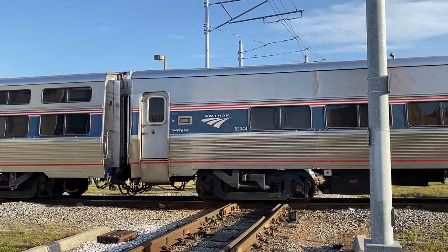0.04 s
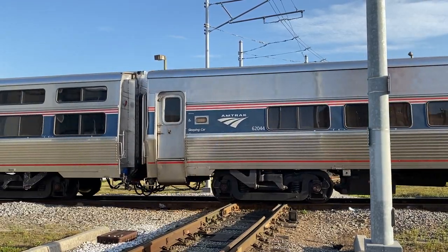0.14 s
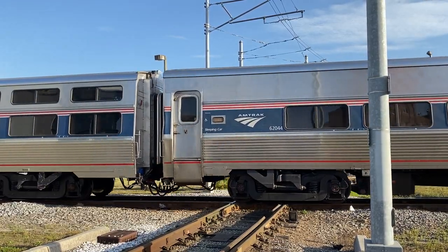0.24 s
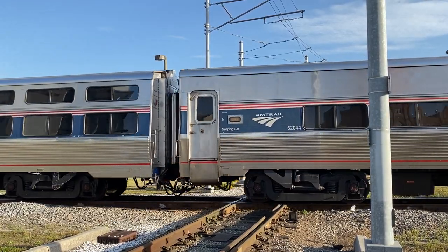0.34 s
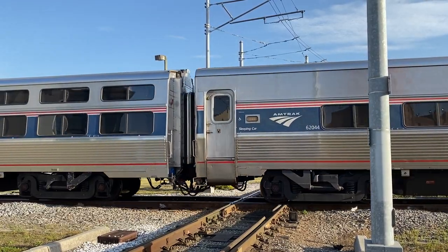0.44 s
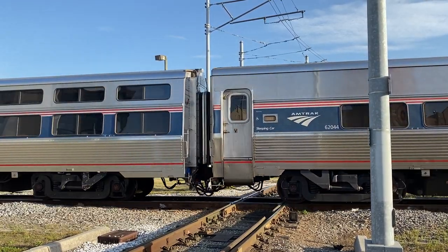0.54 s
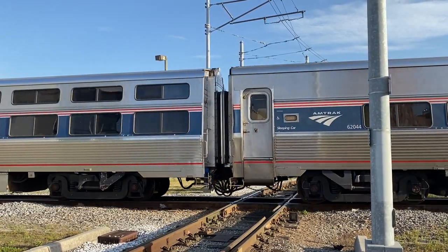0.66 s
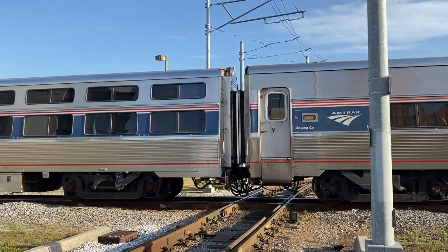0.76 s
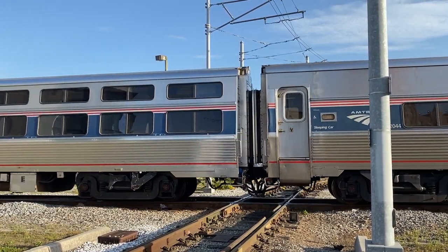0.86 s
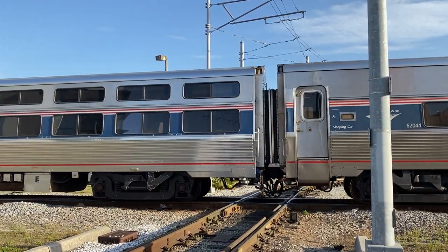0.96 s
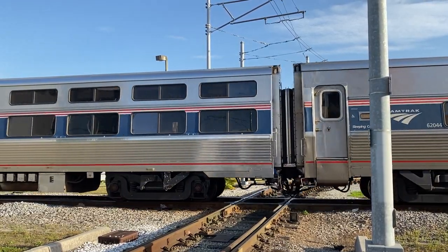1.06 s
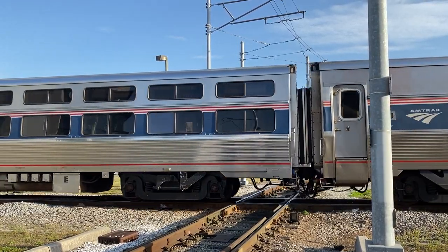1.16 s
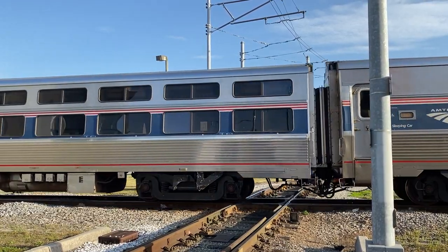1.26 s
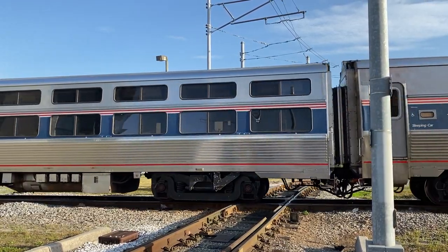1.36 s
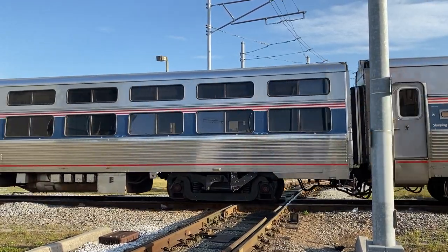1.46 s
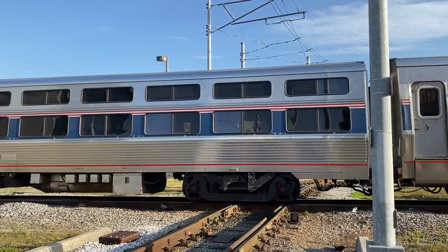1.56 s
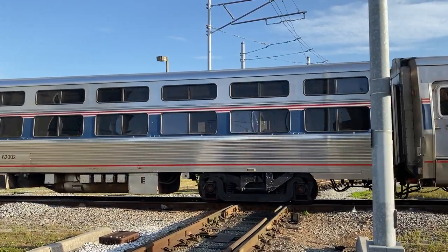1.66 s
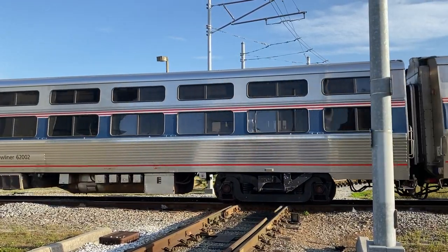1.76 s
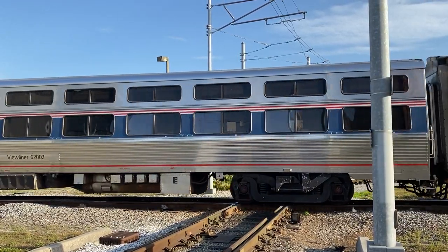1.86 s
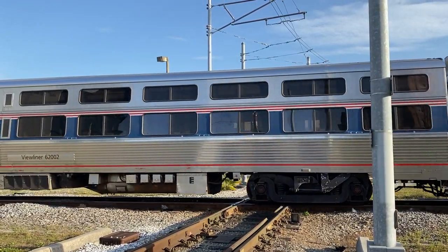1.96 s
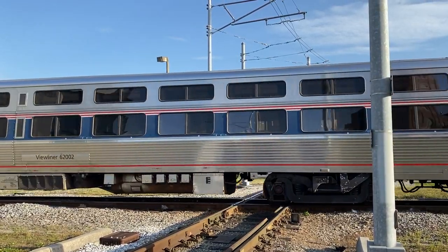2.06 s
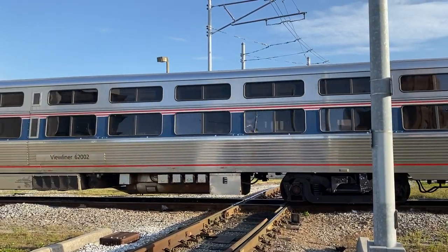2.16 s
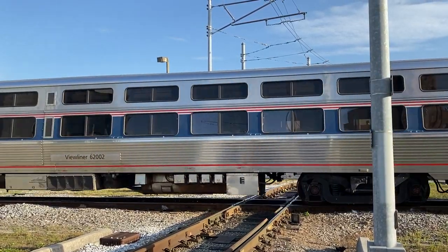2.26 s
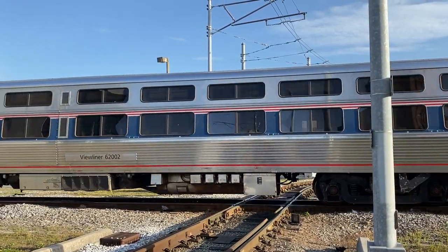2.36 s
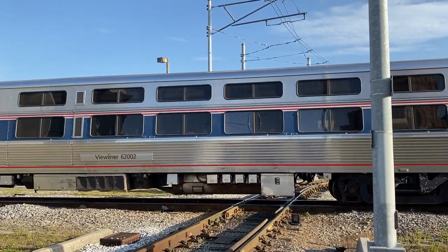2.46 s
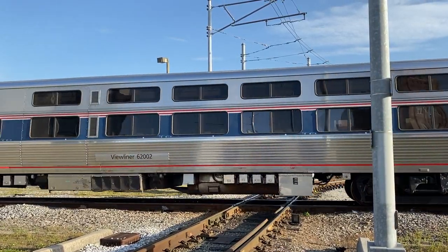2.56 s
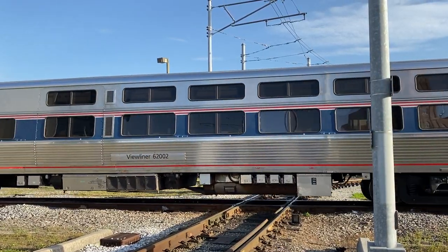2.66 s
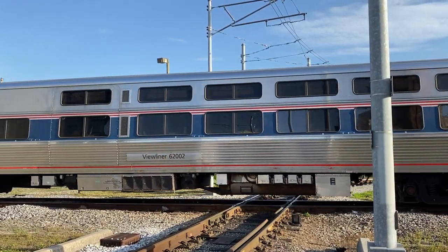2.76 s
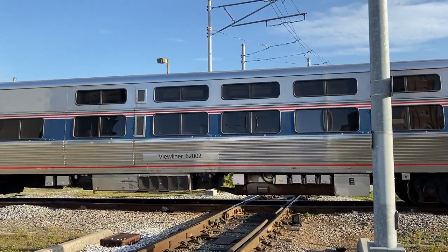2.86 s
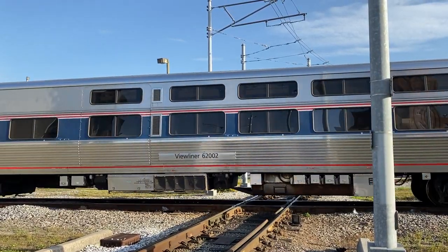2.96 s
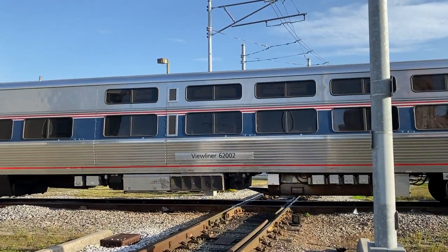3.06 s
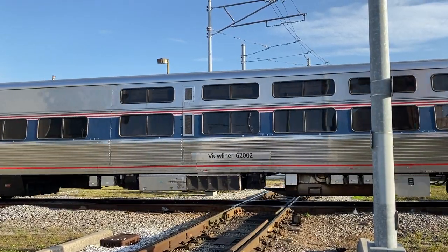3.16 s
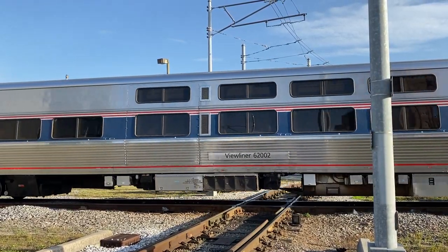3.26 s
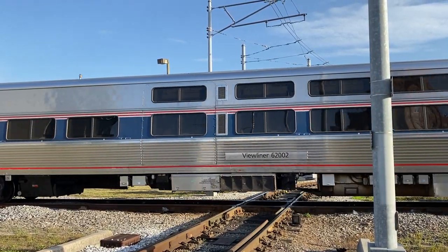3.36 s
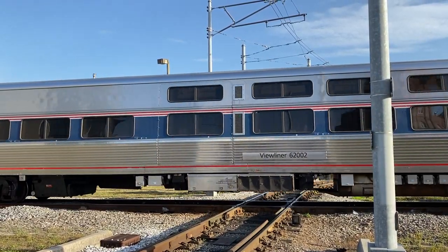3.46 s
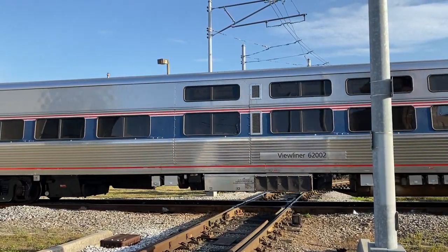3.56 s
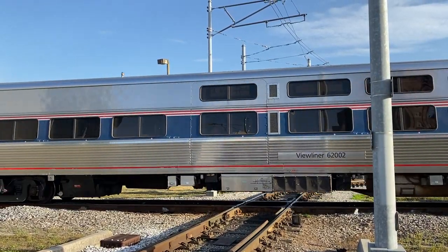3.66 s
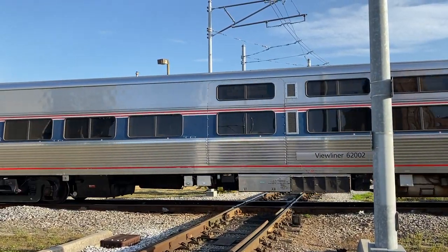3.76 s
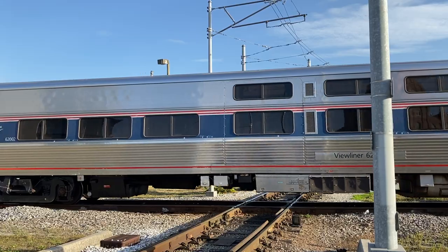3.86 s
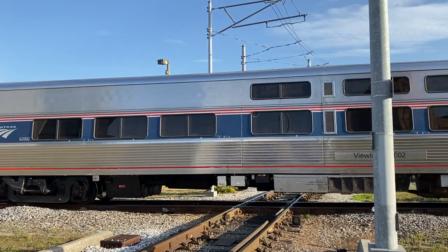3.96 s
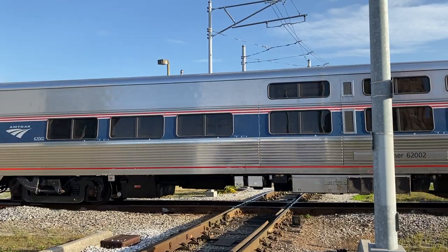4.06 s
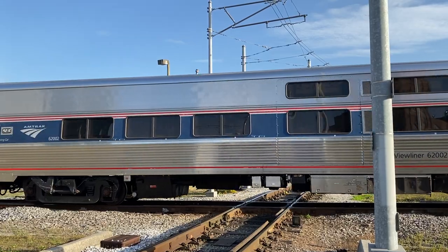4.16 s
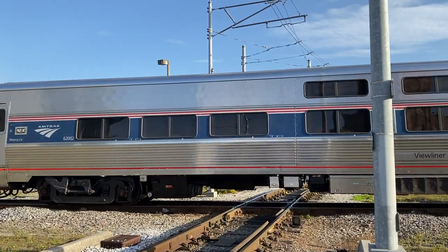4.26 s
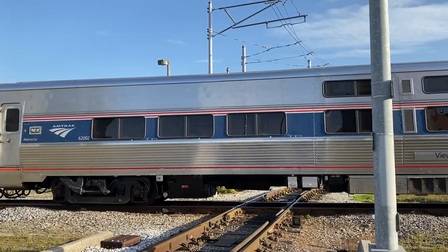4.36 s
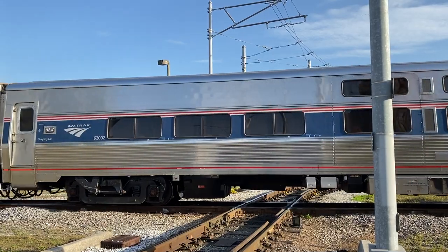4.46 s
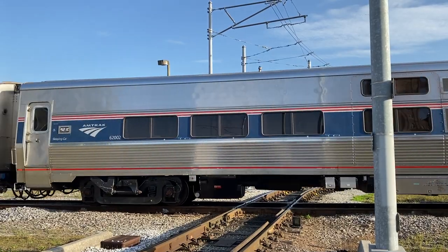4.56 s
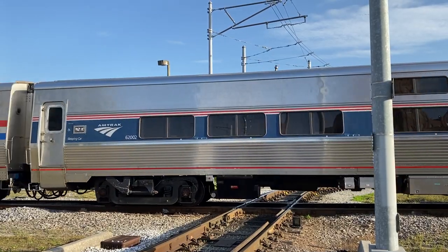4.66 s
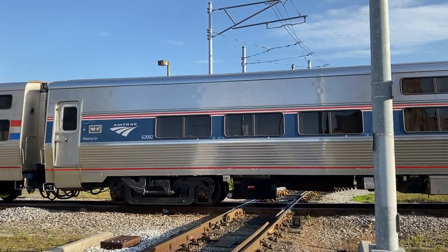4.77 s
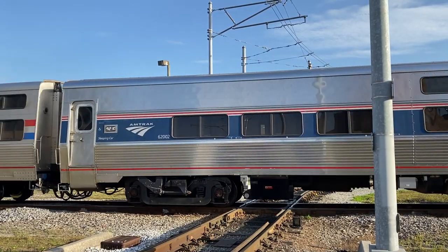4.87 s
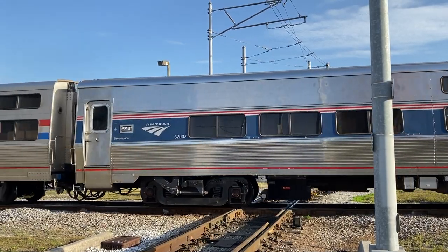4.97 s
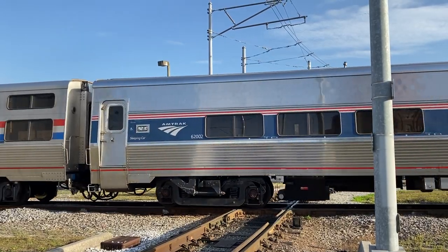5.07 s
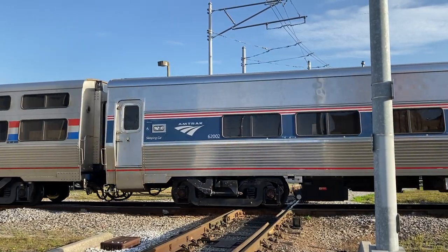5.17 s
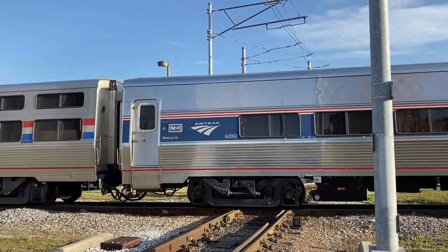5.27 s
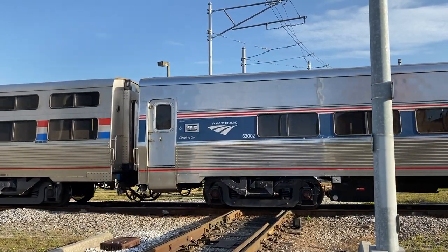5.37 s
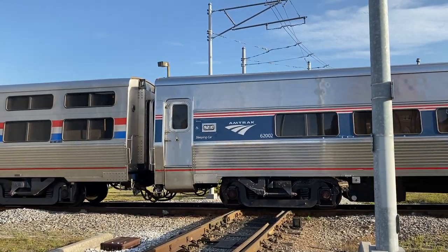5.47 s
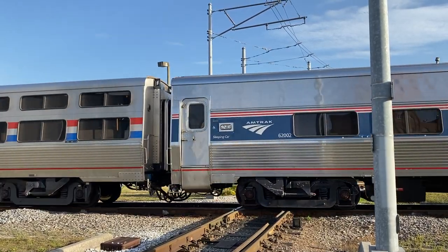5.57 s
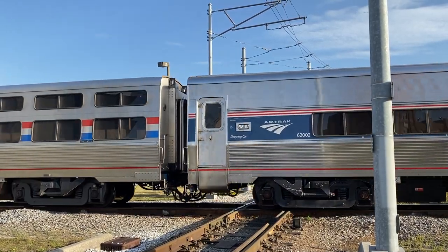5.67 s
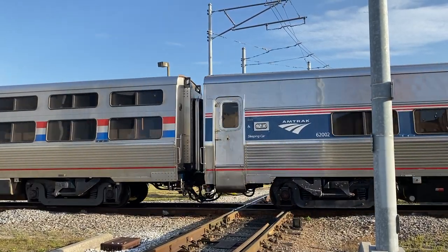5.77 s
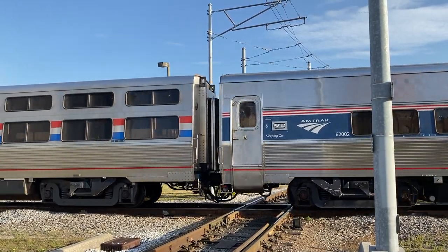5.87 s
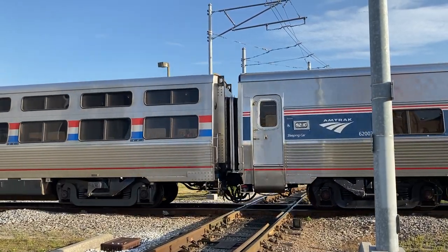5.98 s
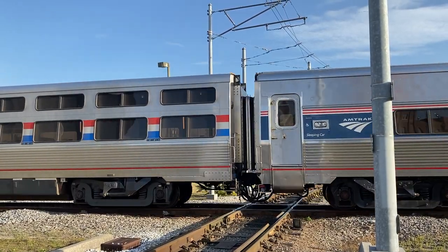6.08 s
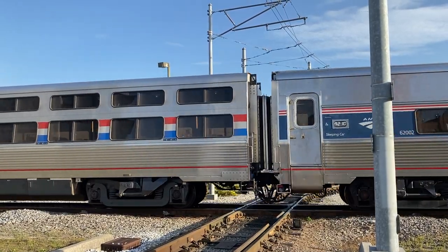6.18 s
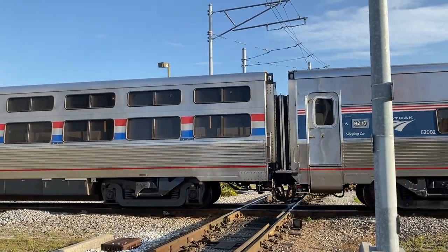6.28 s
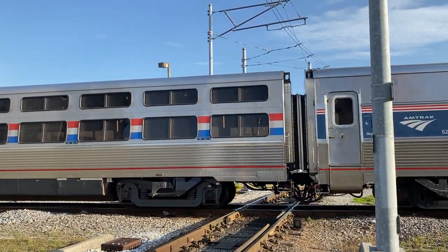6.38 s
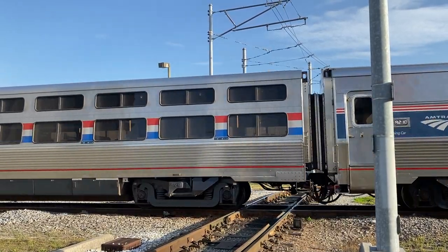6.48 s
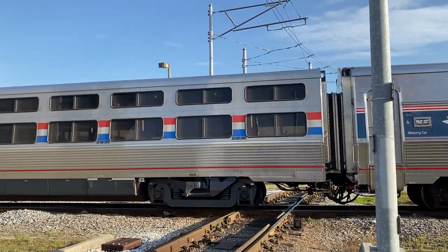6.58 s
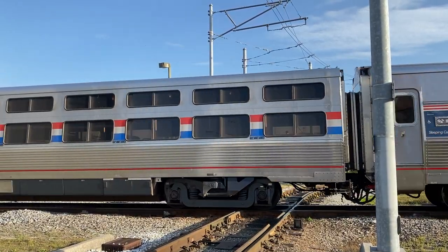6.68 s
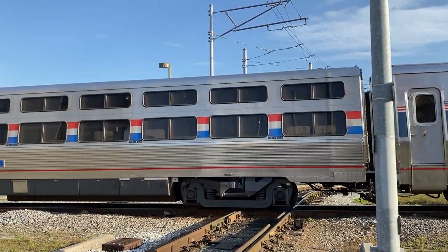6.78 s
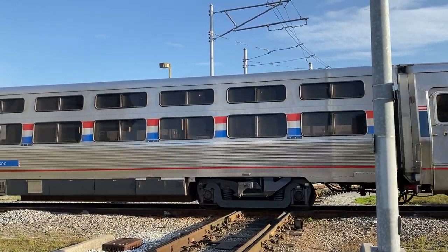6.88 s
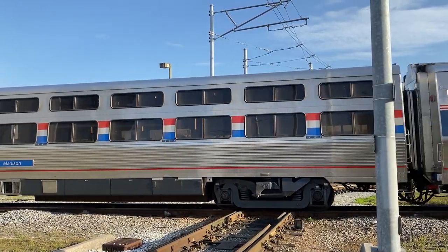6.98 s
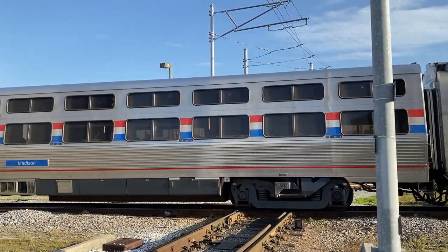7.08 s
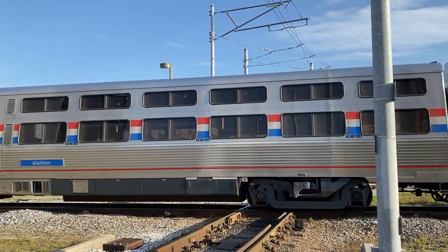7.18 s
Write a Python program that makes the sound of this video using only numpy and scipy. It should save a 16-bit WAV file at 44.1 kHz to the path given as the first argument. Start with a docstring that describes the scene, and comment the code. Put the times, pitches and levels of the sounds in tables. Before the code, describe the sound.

Passenger train cars roll slowly over a track crossing a few metres away, with a continuous low rumble and rail roar. Three heavy wheel clacks land between 0.1 and 0.6 seconds, then four between 1.4 and 2.2. Each is a thud and crack, quickly doubled, leaving a steel ring and often a scrape. From about 2.2 seconds, wheel friction swells into a high hiss with thin, very high squeals, lasting until about 5. A low wavering hum joins from roughly 2.7 to 5 seconds, and lighter knocks come from farther rail joints. Four more heavy clacks strike between 5.1 and 5.9 seconds, with sharp scrapes and bright ringing. A high squeal returns around 6.2 seconds and peaks with a knock and hard scrape near 6.6. Three last clacks follow between 6.7 and 7.2 seconds as the rumble continues.

```python
"""Passenger cars roll slowly over a diamond crossing, a few metres away, above a steady rumble and roar.
First seven axles drop into the two rail gaps, one wheel just after the other: each impact is a thud,
a crack and a ring of wheel modes. From about 2 s flange friction swells into hiss and squeals, a hum
rises, and farther rail joints knock. From 5 s seven more axles strike the gaps, while flanges
scrape the guard rails and the hardest scrapes leave the rims ringing."""
import sys
import numpy as np
from scipy import signal
from scipy.fft import rfft, irfft, next_fast_len
from scipy.io import wavfile
from scipy.ndimage import uniform_filter1d

SR = 44100
rng = np.random.default_rng(int(sys.argv[2]) if len(sys.argv) > 2 else 0)


def waveform_to_disk(signal):
    """Save audio, clipped to [-1, 1], as 16-bit WAV at the path in sys.argv[1]."""
    frames = np.transpose(np.atleast_2d(signal))
    scaled = np.clip(frames, -1, 1) * 32767
    samples = np.round(scaled).astype(np.int16)
    wavfile.write(sys.argv[1], SR, samples)


N = 318843
FFT_SIZE, STEP = next_fast_len(N), 16  # STEP: samples per point of a coarse envelope
T, HZ = np.arange(N) / SR, np.fft.rfftfreq(FFT_SIZE, 1 / SR)

# axles at the gaps: crack_s, thud_hz, second_wheel_delay_s, thud_db, crack_db, second_wheel_db,
# bass_db, treble_db
AXLES = [(0.077, 158, 0.03, 0, -1, -4, 0.5, 0.5), (0.3264, 196, 0.038, -0.5, 0.5, -2.5, 1, 1.5),
         (0.6117, 166, 0.039, 0.5, 1, -4, 0.5, 0.5), (1.4078, 183, 0.039, -1.5, -0.5, -3.5, -4, 1),
         (1.6939, 163, 0.032, -3, -0.5, -3.5, 0.5, 1), (1.9397, 205, 0.034, -1, -1, -4.5, -2, 3),
         (2.2235, 167, 0.035, -1.5, -3, 0, -2.5, 1.5), (5.096, 195, 0.036, -1, -1, -6, -1, 1),
         (5.3753, 156, 0.036, -1.5, -1.5, -7.5, 1, 3), (5.6163, 200, 0.037, -2, -1, -6, 0, 2.5),
         (5.8945, 170, 0.034, -0.5, -1, -2, 0, 0), (6.6692, 191, 0.036, -4, 0.5, -2.5, -3, -1),
         (6.9465, 162, 0.029, -1.5, 2.5, -6, -2.5, 0), (7.1857, 207, 0.029, -6.5, -2.5, -7, 4.5, 2.5)]
# colour of thud, crack, second wheel and rebound: bass_db, treble_db, dulling_db_per_octave
BLOW_COLOURS = [(-5, -2, 5), (-4, 3, 0), (0.5, 2, 0), (6, 5.5, -0.5)]
# noise bands of a blow: centre_hz, relative_db, rise_s, tail_t60_s
CLATTER_BANDS = [(59.4, -19, 0.033, 0.26), (95, -8.5, 0.0097, 0.33), (178, -9, 0.0039, 0.19),
                 (316, -13, 0.0025, 0.35), (672, -10.5, 0.0038, 0.23), (1186, -19.5, 0.0037, 0.21),
                 (2340, -23, 0.007, 0.45), (4340, -33, 0.0045, 0.54), (13700, -21.5, 0.0028, 0.07)]
# modes of the castings and rails: pitch_hz, relative_db, t60_s
CROSSING_MODES = [(87.5, -14, 0.22), (199.2, -10, 0.07), (448, -16, 0.064), (660, -11, 0.05),
                  (840, -13, 0.05), (1404, -18.5, 0.053), (2094, -24, 0.045), (2880, -20, 0.043),
                  (4650, -28, 0.014)]
# wheels ringing at the start, then one row per axle: low_hz, middle_hz, top_hz, low_db, middle_db, upper_db
WHEELSETS = [(1825, 2800, 4620, -42, -40, -52), (1825, 2800, 4674, -50, -36.5, -57),
             (1877, 2846, 4601, -32, -30, -49), (1875, 2831, 4815, -50, -45, -45),
             (1834, 2802, 4571, -35, -29.5, -43), (1822, 2808, 4591, -46, -35, -44),
             (1859, 2835, 4644, -36, -46, -44), (1857, 2816, 4710, -44, -39, -49),
             (1912, 2850, 4656, -46, -41, -42), (1890, 2858, 4791, -42, -40, -54),
             (1865, 2827, 4844, -40, -37, -48), (1865, 2828, 4808, -45, -43, -53),
             (1955, 2819, 4863, -32, -39, -38), (1917, 2760, 4722, -52, -43, -54),
             (1937, 2832, 4800, -46, -34, -45)]
# wheel modes, indexing a wheelset's pitches and levels: pitch_index, ratio, level_index, relative_db, t60_s
WHEEL_MODES = [(0, 1, 0, -2.5, 2.1), (1, .94, 1, 0, .9), (1, 1, 1, 10, .9), (1, 1.333, 2, 13, .8),
               (2, 1, 2, 0, .8)]
# impacts at farther joints: start_s, level_db, pitch_hz, thump_relative_db
JOINT_KNOCKS = [(1.062, -16, 730, -8), (1.341, -9.5, 470, -5), (2.555, -21, 443, 2),
                (2.998, -12.5, 453, -14.5), (3.1, -18.5, 460, -5), (4.064, -14.5, 790, -4.5),
                (4.237, -12, 850, -7), (4.587, -10.5, 514, -12), (4.758, -13.5, 727, -8),
                (4.973, -7, 800, -29), (5.021, -8.5, 610, -6), (5.822, -10.5, 566, -9),
                (6.335, -13, 648, -11), (6.541, -2.5, 800, -14.5), (6.599, -8, 524, -8),
                (7.124, -15.5, 680, -8)]
# sustained flange friction: time_s, level_db, low_hiss_relative_db
RUBBING = [(0.0, -43, -1), (0.55, -45.5, -3), (1.25, -43, -6), (2.12, -39.5, -2.5), (2.23, -28.5, -6),
           (2.67, -33, -4.5), (3.07, -30.5, -5), (3.39, -36, -8), (3.88, -31, -7), (4.45, -31.5, -9),
           (4.71, -28, -6.5), (5.02, -42.5, -4), (6.21, -46, -2.5), (6.27, -34.5, -9), (6.57, -34, -6.5),
           (6.8, -47, 1), (7.23, -37, -7)]
# flanges catching the guard rails: start_s, level_db, low_hiss_relative_db, fade_db_per_s
SCRAPES = [(0.08, -40, -1.5, 26), (0.325, -31, -1, 35), (0.58, -30.5, -2.5, 92), (1.342, -27.5, -15, 150),
           (1.399, -30.5, -5, 60), (1.695, -39.5, 0, 51), (1.94, -41, -5, 19), (5.085, -26.5, -10, 105),
           (5.381, -36, -4, 93), (5.611, -30.5, -4, 90), (5.854, -25.5, -5, 99), (6.61, -21, -13.5, 91),
           (6.95, -31, -8, 92), (7.183, -29, -1.5, 204)]
# low and high friction spectra: frequency_hz, density_db
LOW_HISS = [(2500, 1), (3500, -2), (6500, 2), (7600, 0), (9000, -6.5), (10000, -61)]
HIGH_HISS = [(7000, -40), (8100, -9), (9000, -8), (10000, -3), (11500, -1), (13000, 1), (15000, 0),
             (16000, -2)]
# wheel modes driven by rubbing: pitch_hz, relative_db
SINGING_MODES = [(9860, -3), (9970, -3), (10510, -2), (10680, -2), (11560, -3), (11660, -1), (12090, -3),
                 (12835, 2), (13100, 0), (13340, 1), (13740, -1), (14050, 1), (14180, -2), (14690, 0),
                 (15200, 0), (15430, -3)]
# stick-slip tones: pitch_hz, drift_hz_per_s, width_hz
SQUEALS = [(14815, -30, 130), (14790, -200, 70), (4568, 0, 15), (6300, 50, 100), (10680, -20, 25),
           (11540, 0, 40), (11650, 0, 60), (1875, 0, 20), (1835, 0, 20), (12790, 0, 40), (13095, 0, 35),
           (13350, 0, 35)]
# one envelope per squeal: time_s, level_db
SQUEAL_LEVELS = [
    [(2.15, -43), (2.29, -26), (2.37, -29), (2.45, -20), (2.69, -35), (2.91, -29), (3.55, -43)],
    [(6.59, -45), (6.615, -26), (7.0, -46)],
    [(3.56, -51), (3.77, -38.5), (3.96, -50)],
    [(3.65, -46), (4.074, -41), (4.45, -56)],
    [(3.7, -40), (4.1, -43), (4.4, -39)],
    [(6.22, -42), (6.55, -42), (6.68, -36), (7.0, -53)],
    [(3.8, -53), (4.1, -45), (4.75, -48)],
    [(0.87, -48), (0.95, -38), (1.02, -47), (1.38, -46)],
    [(1.72, -40), (1.86, -34), (2.0, -37)],
    [(2.17, -29), (2.75, -46)],
    [(6.25, -32), (6.62, -29)],
    [(4.55, -36), (4.7, -32), (4.95, -44)],
]
# high modes of the rim: pitch_hz, relative_db, detuning_share
RIM_MODES = [(12360, 0, 1), (12660, -6, .2), (12855, -3, .48), (13695, -6, .54), (14160, -4, .33),
             (14700, -3, -.7), (15223, -6, -.16)]
# rim rings after hard scrapes: start_s, level_db, detuning_fraction
RIM_RINGS = [(1.344, -36, 0), (1.399, -35, 0), (5.092, -31, -.0175), (5.86, -38, -.021), (6.61, -31, 0)]
# rolling noise: time_s, rumble_db, roar_db
ROLLING_LEVELS = [(0.0, -28, -32.5), (0.54, -22.5, -24.5), (0.74, -27, -31.5), (1.17, -29.5, -38),
                  (1.89, -24, -29.5), (2.8, -31, -35.5), (3.52, -34, -36.5), (4.73, -28.5, -35.5),
                  (5.8, -22, -31), (6.04, -25.5, -36), (6.54, -28, -37), (6.74, -24, -31.5),
                  (7.23, -29, -34)]
# spectra of ground rumble and rail roar: frequency_hz, density_db
RUMBLE = [(20, -24), (45, -3.5), (70, 2), (128, -4), (214, -5.5), (270, -4.5), (340, -25), (420, -45)]
ROAR = [(250, -44), (330, 8.5), (520, 3), (800, 1.5), (1180, -2.5), (1340, 1.5), (1700, -6), (2600, -6),
        (3870, -7), (5000, -19)]
# envelope of the hum: time_s, level_db
HUM_LEVELS = [(2.6, -27), (2.68, -59), (2.76, -34.5), (3.29, -31.5), (3.41, -42), (3.49, -30.5),
              (3.62, -45), (3.83, -27), (4.22, -38.5), (4.31, -29), (4.76, -29.5), (5.04, -39)]
# phase between left and right, falling through the treble in steps that hold at multiples of pi: frequency_hz,
# left_lead_rad
STEREO_PHASE = [(0, 0), (1200, .35), (1900, 0), (3000, 1.7), (3600, 2.7), (3950, -.2), (7400, 0),
                (8500, -np.pi), (9350, -np.pi), (10900, -2 * np.pi), (11250, -2 * np.pi),
                (13050, -3 * np.pi), (13400, -3 * np.pi), (15300, -4 * np.pi)]
# stereo width, how alike left and right sound: frequency_hz, correlation
STEREO_COHERENCE = [(30, .997), (130, .985), (300, .91), (950, .9), (2000, .75), (3000, .85), (3700, .4),
                    (5500, .15), (6800, .75), (7300, .84), (7900, .72), (8600, .999), (9300, .999),
                    (10000, .86), (11100, .998), (12200, .9), (13200, .999), (14200, .9), (15400, .998)]
# stereo balance: frequency_hz, left_minus_right_db
STEREO_BALANCE = [(60, -.5), (260, -.9), (600, .5), (1300, 2), (2400, -2.5), (4400, 4), (6000, 0)]


def blows(thud_lead_s=.008, rebound_s=.028, rebound_db=-15):
    """Impact excitation: each axle gives a thud, a crack, the second wheel's blow and a rebound."""
    rows = []
    for crack_s, _, lag_s, thud_db, crack_db, second_db, bass_db, treble_db in AXLES:
        delays_s = (-thud_lead_s, 0, lag_s, lag_s + rebound_s)
        levels_db = (thud_db, crack_db, second_db, second_db + rebound_db)
        for delay, db, (bass, treble, dulling) in zip(delays_s, levels_db, BLOW_COLOURS):
            rows.append((min(crack_s + delay, T[-1]), db, bass_db + bass, treble_db + treble, dulling))
    return rows


def colour_db(hz, bass_db, treble_db, dulling):
    """Spectral tilt of a blow: shelves either side of 650 Hz and a slope above the bass."""
    side = np.clip(np.log2(hz / 650) / 2, -1, 1)
    return abs(side) * np.where(side > 0, treble_db, bass_db) - dulling * np.log2(1 + hz / 250)


def clatter():
    """Broadband impact response: rails, ties and bogies shake, each band with its own rise and decay."""
    white, t, out = rfft(rng.standard_normal((2, FFT_SIZE))), T[:SR:STEP], np.zeros((2, N))
    start_s, blow_db, *colour = np.transpose(blows())
    approach = gain_of(2 * (-13 - 380 * abs(t - .1))) * (t < .11)  # the wheel rumbles onto the casting
    for hz, db, rise_s, t60 in CLATTER_BANDS:
        band = filtered(white, np.exp(-(np.log2(HZ / hz + 1e-9) / .66) ** 2))
        crack, body, tail = (gain_of(-120 * t / (share * t60)) for share in (.09, .4, 1))
        burst = (1 - np.exp(-t / rise_s)) ** 2 * (4 * crack + .18 * body + .7 * tail)
        level_db = blow_db + db + colour_db(hz, *colour)
        power = struck(start_s, burst, level_db) + struck(np.maximum(start_s - .1, 0), approach, level_db)
        out += band * amplitude(power)
    return out * gain_of(2.2 * wander(70))  # the level flutters as loose parts bounce


def thuds(level_db=-5, swell_s=.0092, t60=.06):
    """Bending under load: the rail end swings, dips deepest at the crack, and is damped."""
    t, out = T[:SR // 9] - 2 * swell_s, np.zeros((2, N))
    envelope = np.where(t < 0, np.exp(-(t / swell_s) ** 6), gain_of(-60 * t / t60))
    for crack_s, hz, _, db, *_ in AXLES:
        swing = -gain_of(level_db + db) * envelope * np.exp(2j * np.pi * hz * t)
        add(out, crack_s + t[0], np.array([swing.real, swing.imag]))
    return out


def clanks():
    """Modal response of steel: each blow starts the same modes, a little shifted by where it lands."""
    t, out = T[:SR // 9], np.zeros((2, N))
    hz, db, t60 = np.transpose(CROSSING_MODES * 2)[:, :, None]  # each mode is a close pair
    attack = 1 - np.exp(-t / (.001 + 1.1 / hz))
    for start_s, blow_db, bass_db, treble_db, dulling in blows():
        scatter, detune, phase = rng.standard_normal((3, len(hz), 1))
        level_db = blow_db + db + colour_db(hz, bass_db, 2.13 * treble_db, dulling) + 1.5 * scatter
        envelope = attack * gain_of(level_db - 60 * t / t60)
        angle = 2 * np.pi * (hz * (1 + .0445 * detune) * t + scatter)
        add(out, start_s, (envelope * np.sin([angle, angle + np.pi * phase])).sum(1))
    return out


def wheels(delay_s=.0114, rise_s=.014):
    """Free vibration: struck wheels ring on, beating raggedly through rotation and rolling contact."""
    t, out = T[:2 * SR:STEP], np.zeros((2, N))
    start_s = np.append(0, np.transpose(AXLES)[0] + delay_s)
    pitches_hz, levels_db = np.split(np.transpose(WHEELSETS), 2)
    latest = np.maximum(np.searchsorted(start_s, T) - 1, 0)  # the last wheelset struck sets the pitch
    for pitch_index, ratio, level_index, db, t60 in WHEEL_MODES:
        hz = ratio * pitches_hz[pitch_index]
        beating = 1.5 + .45 * (wander(.02 * hz[0]) + 1j * wander(.02 * hz[0]))
        ring = beating * np.exp(2j * np.pi * np.cumsum(hz[latest]) / SR)
        power = (1 - np.exp(-t / rise_s)) * gain_of(-120 * t / t60)
        envelope = amplitude(struck(start_s, power, db + levels_db[level_index]))
        out += envelope * np.array([ring.real, ring.imag])
    return out


def knocks():
    """Damped resonance at farther joints: a short ring, a tick, a thump and one lasting rail mode."""
    t, out = T[:SR // 7], np.zeros((2, N))
    attack = 1 - np.exp(-t / .0048)
    for start_s, db, hz, thump_db in JOINT_KNOCKS:
        grit = rng.standard_normal((2, len(t)))
        ring = resonate(grit, hz, width_hz=560) * gain_of(-7 - 60 * t / .08)
        tick = resonate(grit, 1660, width_hz=1040) * gain_of(-18.5 - 60 * t / .11)
        thump = resonate(grit, 173, width_hz=105) * gain_of(thump_db - 60 * t / .15)
        mode = np.sin(2 * np.pi * 445 * t + grit[:, :1]) * gain_of(thump_db - 14.5 - 60 * t / .6)
        add(out, start_s, gain_of(db) * attack * (ring + tick + thump + mode))
    return out


def friction_envelopes(catch_s=.00086):
    """Powers add: steady rubbing plus sudden, fading scrapes give the high and low hiss amplitudes."""
    level_db, low_db = columns(RUBBING, T[::STEP])
    high, low = gain_of(2 * level_db), gain_of(2 * (level_db + low_db))
    for start_s, db, low_db, fade_db_per_s in SCRAPES:
        t = np.maximum(T[::STEP] - start_s, 0)
        power = (1 - np.exp(-t / catch_s)) ** 2 * gain_of(2 * (db - fade_db_per_s * t))
        high += power
        low += power * gain_of(2 * low_db)
    return amplitude(high), amplitude(low)


def flanges(width_hz=24, swell_db=4, singing_db=-6):
    """Forced vibration: friction hisses and drives high wheel modes, each coming and going."""
    high_gain, low_gain = friction_envelopes()
    hz, t, white = signal.stft(rng.standard_normal((2, N)), SR, nperseg=4096, noverlap=3072)
    swells = unit_rms(uniform_filter1d(rng.standard_normal((len(SINGING_MODES), len(t))), 14, axis=1))
    response = sum(gain_of(db + swell_db * swell) / (1 + (2 * (hz[:, None] - mode_hz) / width_hz) ** 2)
                   for (mode_hz, db), swell in zip(SINGING_MODES, swells))
    singing = unit_rms(signal.istft(white * response, nperseg=4096, noverlap=3072)[1][:, :N])
    high = streaked_noise(HIGH_HISS, streak_db=3.8) + gain_of(singing_db) * singing
    flicker = gain_of(.32 * wander(30))
    return flicker * (high_gain * high + low_gain * streaked_noise(LOW_HISS, streak_db=4.5))


def squeals(steady_hz=30):
    """Stick-slip oscillation holds one wheel mode: steady when narrow, fluttering when wide."""
    out = np.zeros((2, N))
    for (hz, drift, width_hz), levels in zip(SQUEALS, SQUEAL_LEVELS):
        t = np.arange(levels[0][0], levels[-1][0], 1 / SR)
        pitch_hz = hz + drift * (t - t[0])
        flutter = resonate(rng.standard_normal((2, len(t))), pitch_hz, width_hz)
        held = tone_pair(pitch_hz) * steady_hz / width_hz
        envelope = gain_of(columns(levels, t)[0]) * signal.windows.tukey(len(t), .15)
        add(out, t[0], unit_rms(flutter + held) * envelope)
    return out


def rims(t60=1.2, damped_after_s=.34):
    """Free decay of high rim modes, each beating a little, until contact with the rail damps them."""
    t, out = np.arange(0, damped_after_s, 1 / SR), np.zeros((2, N))
    hz, db, share = np.transpose(RIM_MODES)[:, :, None]
    decay = gain_of(-60 * t / t60) * signal.windows.tukey(len(t), .06)
    for start_s, ring_db, detune in RIM_RINGS:
        scatter, beat_rate, phase = rng.standard_normal((3, len(hz), 1))
        beating = 1 + .5 * np.sin(2 * np.pi * (12 * beat_rate * t + phase))
        angle = 2 * np.pi * (hz * (1 + share * detune) * t + phase)
        envelope = gain_of(ring_db + db + 2 * scatter) * beating * decay
        add(out, start_s, (envelope * [np.sin(angle), np.cos(angle)]).sum(1))
    return out


def rolling(hum_hz=264, hum_rest_db=-38):
    """Roughness excitation: the rail roars and the ground carries a rumble, beside a wavering hum."""
    rumble_db, roar_db = columns(ROLLING_LEVELS, T)
    hum_db = np.interp(T, *np.transpose(HUM_LEVELS), hum_rest_db, hum_rest_db)
    hum = gain_of(hum_db) * np.sqrt(2) * tone_pair(hum_hz + wander(6))
    rumble = gain_of(rumble_db + .8 * wander(15)) * streaked_noise(RUMBLE, streak_db=2.2)
    roar = gain_of(roar_db + .5 * wander(7.2)) * streaked_noise(ROAR, streak_db=3.84)
    return rumble + roar + hum


def streaked_noise(spectrum, streak_db):
    """Spectral modulation: two independent noises of one colour, with narrow bands that come and go."""
    white = signal.stft(rng.standard_normal((2, N)), nperseg=1024)[2]
    streaks = uniform_filter1d(rng.standard_normal(white.shape[1:]), 2, axis=0)
    streaks = unit_rms(uniform_filter1d(streaks, 14, axis=1))
    streaked = signal.istft(white * gain_of(streak_db * streaks), nperseg=1024)[1][:, :N]
    in_band = (HZ >= spectrum[0][0]) & (HZ <= spectrum[-1][0])
    return filtered(rfft(streaked, FFT_SIZE), gain_of(over_frequency(spectrum)) * in_band)


def resonate(x, hz, width_hz):
    """Resonance by heterodyning: shift hz to zero, smooth twice, shift back; rms 1."""
    carrier = np.exp(2j * np.pi * np.cumsum(hz * np.ones(x.shape[-1])) / SR)
    pole = np.exp(-np.pi * width_hz / SR)
    smoothed = signal.lfilter([(1 - pole) ** 2], [1, -2 * pole, pole * pole], x / carrier)
    return unit_rms((carrier * smoothed).real)


def struck(times_s, power_curve, levels_db):
    """Incoherent summation: every blow adds one power curve, in coarse time."""
    impulses = np.zeros(N // STEP + 1)
    np.add.at(impulses, (times_s * SR / STEP).astype(int), gain_of(2 * levels_db))
    return abs(signal.oaconvolve(impulses, power_curve)[:len(impulses)])


def amplitude(power):
    """Square root of coarse power, at every sample."""
    return np.interp(T, np.arange(len(power)) * STEP / SR, np.sqrt(power))


def tone_pair(hz):
    """Two sines in quadrature along a pitch curve."""
    return np.sin(2 * np.pi * np.cumsum(hz) / SR + [[0], [np.pi / 2]])


def wander(per_s):
    """Random modulation of rms 1."""
    steps = rng.standard_normal(int(N / SR * per_s) + 3)
    return unit_rms(np.interp(T * per_s, np.arange(len(steps)), steps))


def filtered(spectrum, gain):
    """Spectral weighting, returned to time at rms 1."""
    return unit_rms(irfft(spectrum * gain, FFT_SIZE)[..., :N])


def over_frequency(points):
    """Interpolation of a table on a log frequency axis."""
    hz, value = np.transpose(points)
    return np.interp(np.log(HZ + 1), np.log(hz + 1), value)


def columns(rows, t):
    """Interpolation of each column at times t."""
    time_s, *curves = np.transpose(rows)
    return [np.interp(t, time_s, curve) for curve in curves]


def add(mix, start_s, sound):
    """Superposition of a sound from start_s on."""
    part = mix[..., round(start_s * SR):][..., :sound.shape[-1]]
    part += sound[..., :part.shape[-1]]


def gain_of(db):
    """Decibels to amplitude ratio; doubled decibels give the power ratio."""
    return 10 ** (np.asarray(db) / 20)


def unit_rms(x):
    """Normalisation to rms 1."""
    return x / np.sqrt(np.mean(x ** 2) + 1e-20)


def scene():
    """Superposition of all sources, as two uncorrelated versions of one sound field."""
    impacts = gain_of(-3) * clatter() + thuds() + clanks() + wheels() + knocks()
    return impacts + rolling() + flanges() + squeals() + rims()


def record(dry, ceiling=.96, cutoff_hz=15950):
    """Partial coherence: left and right differ in phase and level; peaks saturate; a low-pass follows."""
    shared, independent = rfft(dry, FFT_SIZE)
    coherence = np.clip(over_frequency(STEREO_COHERENCE), 0, 1)
    half_lead = np.exp(.5j * np.interp(HZ, *np.transpose(STEREO_PHASE)))
    half_balance = gain_of(over_frequency(STEREO_BALANCE) / 2)
    left = shared * half_lead * half_balance
    right = (coherence * shared + np.sqrt(1 - coherence ** 2) * independent) / half_lead / half_balance
    stereo = irfft([left, right], FFT_SIZE)[:, :N]
    rounded = stereo / (1 + abs(stereo / ceiling) ** 4) ** .25
    low_pass = signal.firwin(511, cutoff_hz, window=("kaiser", 9), fs=SR)
    return signal.oaconvolve(rounded, low_pass[None], "same")


dry = scene()
out = record(dry)
waveform_to_disk(out)
```